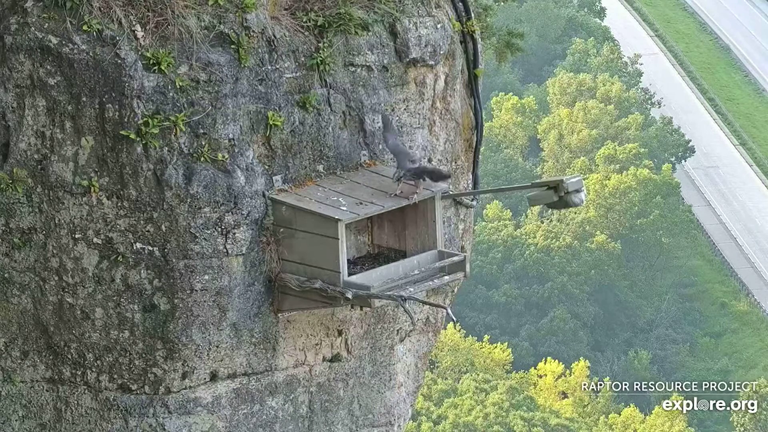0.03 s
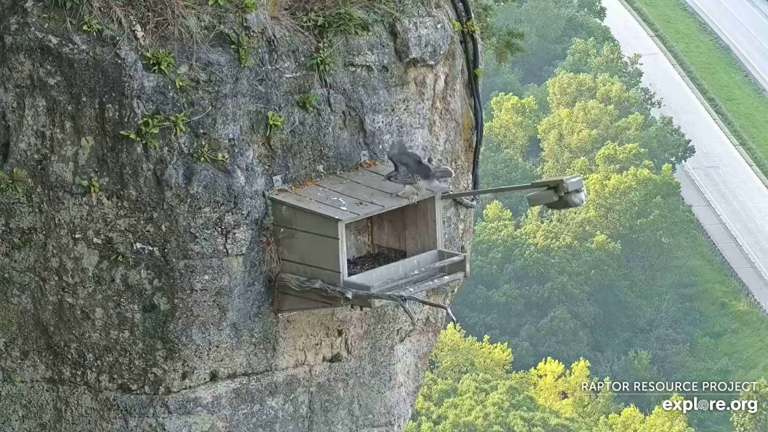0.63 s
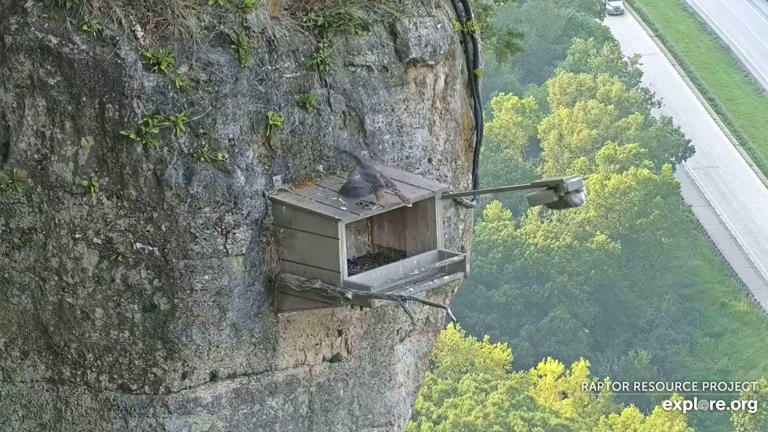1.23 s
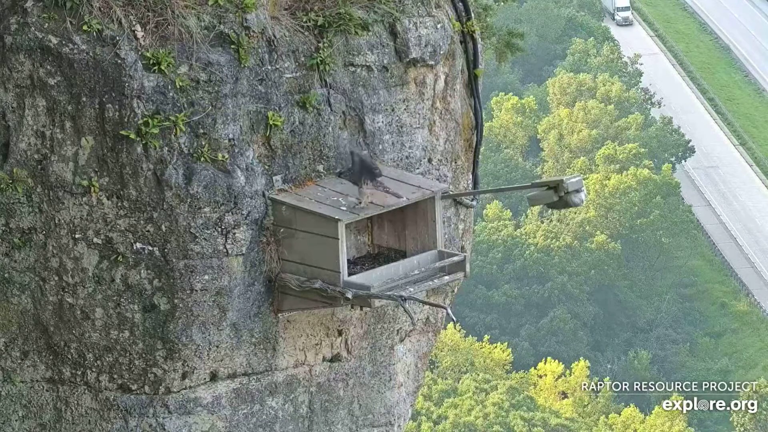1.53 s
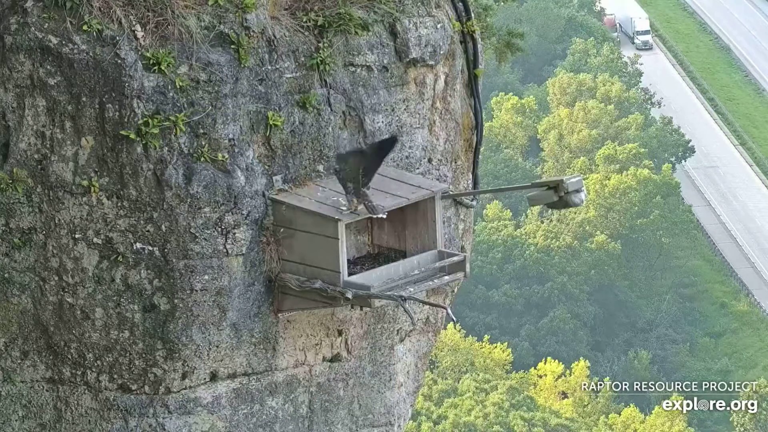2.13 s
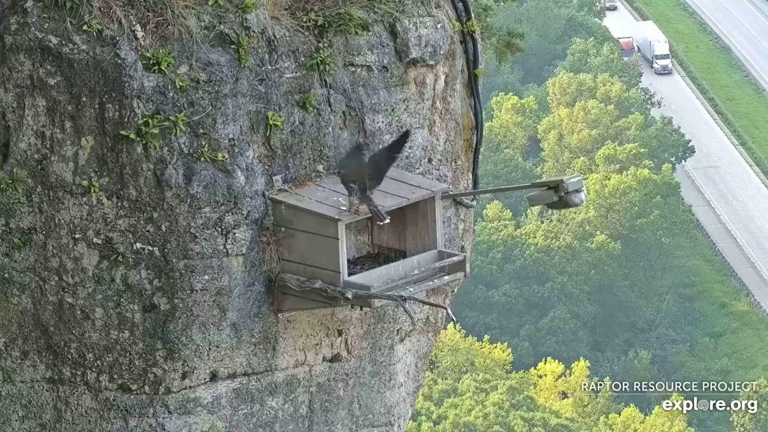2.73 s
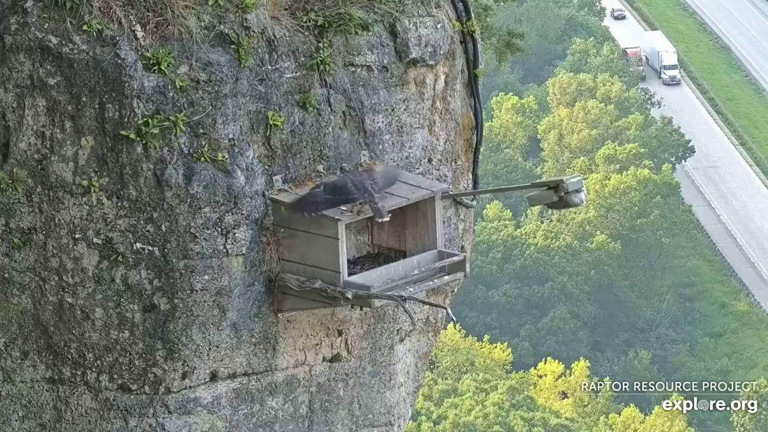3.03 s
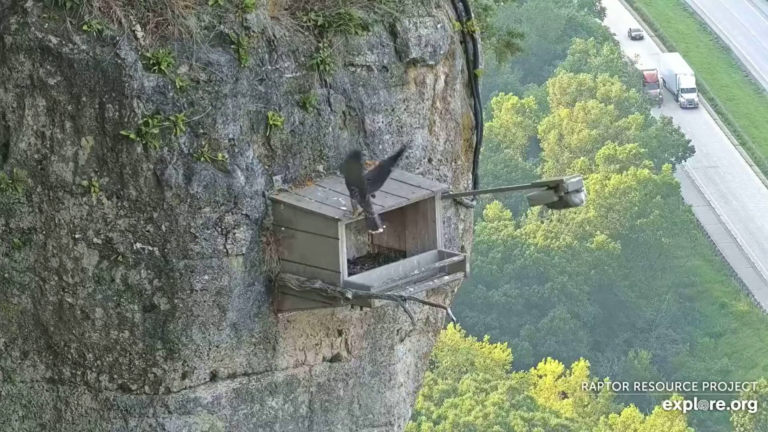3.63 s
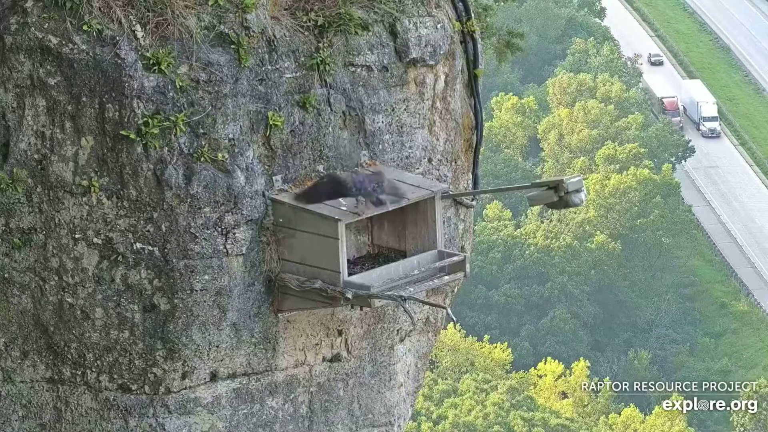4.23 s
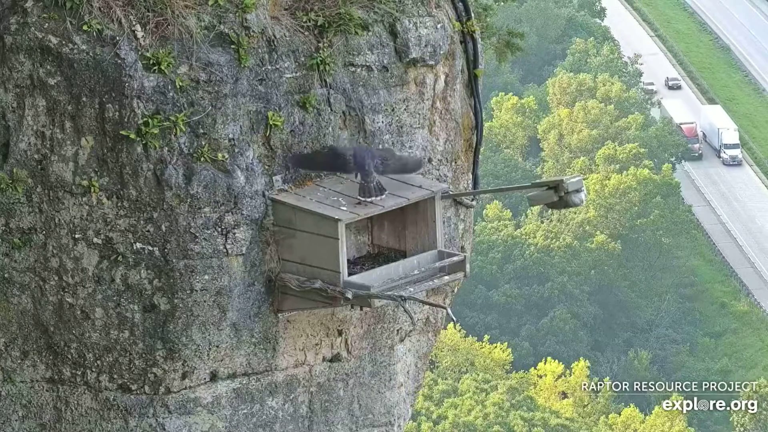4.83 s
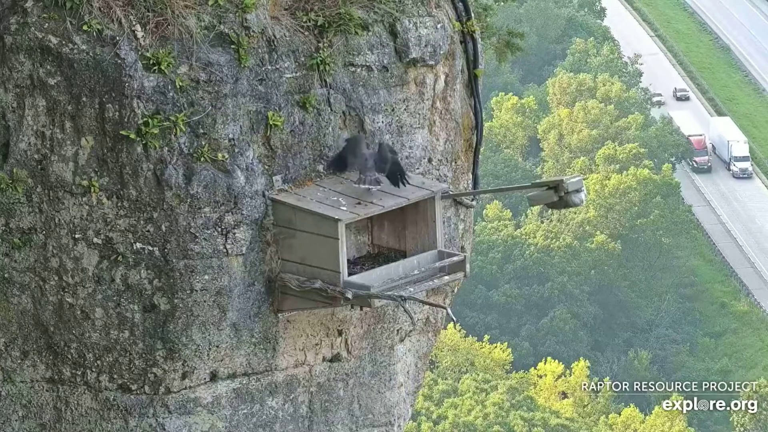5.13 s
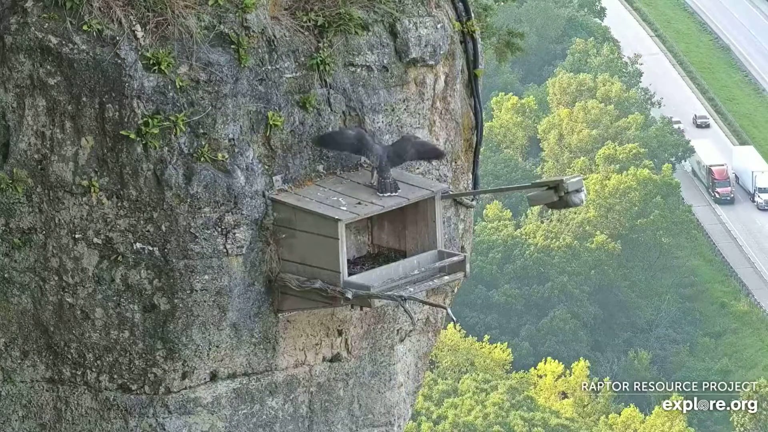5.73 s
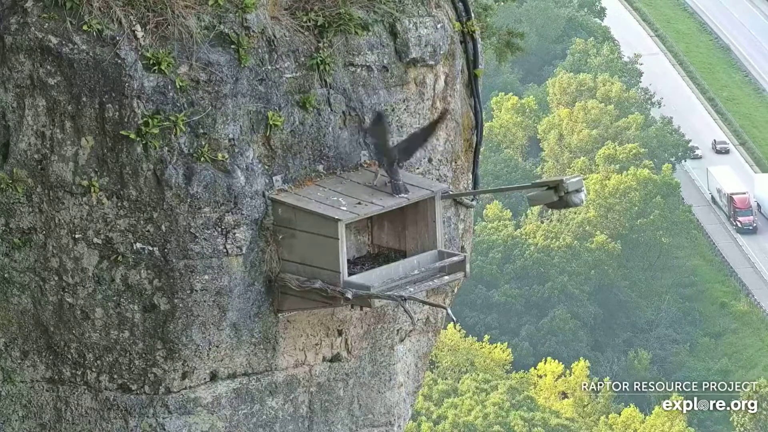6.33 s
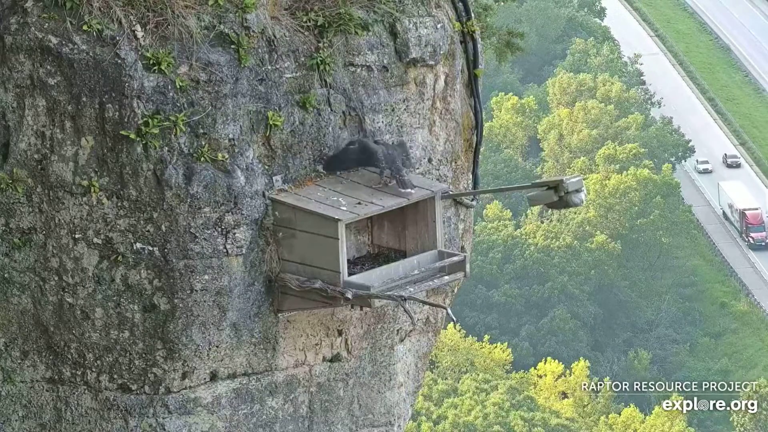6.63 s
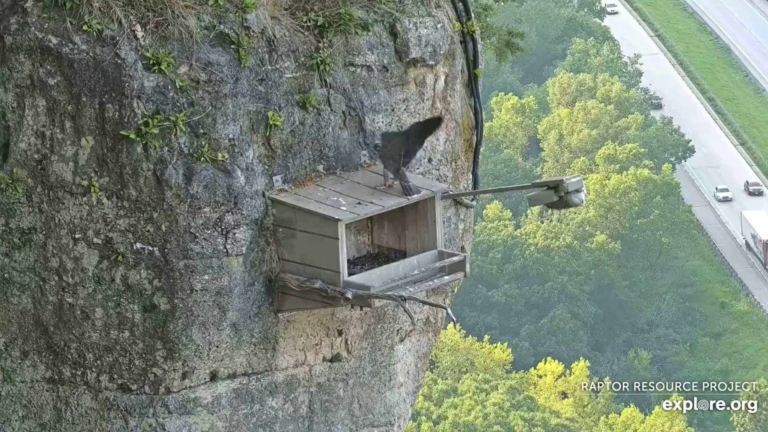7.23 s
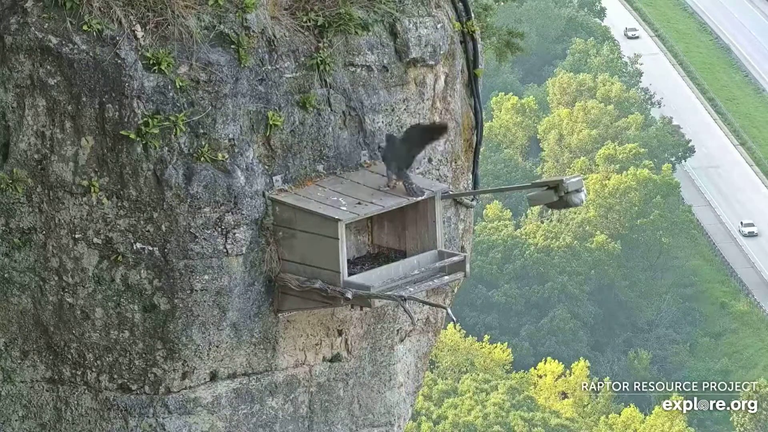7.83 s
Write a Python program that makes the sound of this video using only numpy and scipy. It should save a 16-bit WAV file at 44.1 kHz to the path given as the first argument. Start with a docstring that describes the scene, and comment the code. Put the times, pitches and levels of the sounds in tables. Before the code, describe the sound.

A young falcon begs on the roof of a wooden nest box on a cliff. Its harsh, high wails come two or three a second, each opening as a thin squeal, swelling and ending in a creak. Near the end they give way to shorter, quieter hoarse squawks. Its feet thump the box now and then, with a few faint talon scratches. One microphone catches a slight rock echo and a highway rumbling far below.

```python
"""Harsh begging wails from a young falcon on the roof of a wooden nest box, on a cliff; one microphone.
Each wail opens as a thin squeal from one side of the syrinx, swells in two pushes as the full voice
catches, and falls into a creak as the membranes slacken; short hoarse squawks end the series.
Its feet thump the box, its talons scratch the boards, and the rock face returns a faint echo.
Far below, a highway rumbles in the valley."""
import sys
import numpy as np
from scipy import signal
from scipy.fft import rfft, irfft, next_fast_len
from scipy.io import wavfile

SR = 44100
rng = np.random.default_rng(int(sys.argv[2]) if len(sys.argv) > 2 else 0)


def dump(signal):
    """Clip the signal to [-1, 1] and save it as 16-bit WAV at the path in sys.argv[1]."""
    limited = np.clip(np.atleast_2d(signal).T, -1, 1)
    pcm = np.round(limited * 32767).astype(np.int16)
    wavfile.write(sys.argv[1], SR, pcm)


N = 348390
TIME = np.arange(N) / SR

# overtones of either side of the syrinx, against the strong second harmonic: frequency_hz, level_db
OVERTONE_LEVELS = [(3550, -16.5), (4000, -18.5), (5200, -26), (6600, -30.5), (8000, -40.5), (14000, -51.5)]


def falcon(loud_db=-24, yelp_lead_s=.0268, yelp_s=.013, rasp_share=.2, spit_db=-18, spit_hz=6000):
    """The bird: hoarseness trades wail for squeal and rasp; effort lifts overtones; calls end in a yelp."""
    gate, age, left, closing, creaking, caught, effort_db, pitch, rough, bright_db, root_db = gestures()
    strain = np.clip((effort_db - loud_db) / 6, 0, 1)
    yelp = (1 - creaking) * bump(left - yelp_lead_s, yelp_s)
    bright_db = bright_db - 10 * closing ** 2
    rough = np.clip(rough + .18 * yelp, 0, 1)
    # the second side sounds as the call opens, and cuts in now and then while it is hoarse
    cutting_in = np.clip(wobble(9.7), 0, 1) * rough ** 2
    squeal_share = np.clip(.56 * (1 - caught) + cutting_in, 0, 1)
    pitch = pitch * (1 - .23 * np.exp(-left / .019))  # tension drops at the end
    tilt_db_per_octave = 3.5 * yelp + .07 * (effort_db - loud_db)
    wail = syrinx(pitch, rough, bright_db, tilt_db_per_octave, root_db)
    tone = crossfade(wail, squeal(age, bright_db), squeal_share)
    voiced = crossfade(tone, creak(left), creaking)
    voice = crossfade(voiced, rasp(bright_db + 5 * yelp), rasp_share * rough)
    spit = rms_one(filtered(rng.standard_normal(N), spit_hz, "high"))
    voice += from_db(spit_db) * strain * yelp * spit  # the loudest yelps spit bright air
    tremble_db = 1.6 * (1.5 - strain / 2) * wobble(95)
    return gate * from_db(effort_db + tremble_db) * voice


def calls():
    """The begging series, one row a call: long wails, then short squawks that share one hoarse voice."""
    # long wails (root is the fundamental): start_s, end_s, squeal_s, pitch_hz, climb_hz, level_db,
    # first_push_db, last_push_db, hoarseness (0-1), bright_db, root_db, creak_s
    wails = [(0.106, .474, 0.065, 1252, 150, -29, -0.5, 13, 0.25, 2, -9, .006),
             (0.571, 0.911, 0.043, 1310, 130, -35.5, 0, 5, 0.39, 6.5, -3.5, 0.012),
             (1.027, 1.335, .01, 1375, 119.5, -32, -3.5, 3, 0.24, 2.5, -3, 0.018),
             (1.447, 1.748, 0.032, 1334, -41, -34, -4, 7, 0.18, 6, -11, 0.019),
             (1.871, 2.15, 0.073, 1344, -1, -31.5, 6.5, 12, 0.25, 0.5, -8.5, 0.017),
             (2.264, 2.566, 0.096, 1332, 81, -30, -2, 10.5, 0.25, 2, -7.5, .022),
             (2.688, 2.96, 0.083, 1324, -2, -32, 6.5, 4, 0.55, -.5, -8, 0.027),
             (3.1, 3.394, 0.084, 1320, 22, -31, 7, 12, 0.34, 2.5, -5.5, 0.027),
             (3.519, 3.787, 0.078, 1349, 81.5, -27, 7.5, 10, .24, 3.5, -9.5, 0.023),
             (3.915, 4.047, 0.069, 1220, -120, -25.5, -2, 6.5, .5, 3.5, -20.5, 0.017),
             (4.116, 4.22, 0.037, 1370, 259.5, -22, -3, 2.5, 0.49, 2.5, -7, 0.013),
             (4.294, 4.424, 0.037, 1356, 7, -32.5, 7.5, 9.5, 0.09, 4, -11, 0.0082),
             (4.503, 4.77, 0.045, 1363, -38, -26, 6, 8, 0.22, 3, -9, 0.017),
             (4.917, 5.228, 0.06, 1374, -1, -28, 5, 7, 0.26, 5, -4.5, 0.012),
             (5.374, 5.677, 0.045, 1324, 77, -28, 11, 3, 0.38, -2.5, -8, .012),
             (5.803, 6.089, 0.072, 1273, 30, -30.5, 9, 3.5, 0.37, 1, -8, 0.036)]
    # squeals that crack and run down into a creak: start_s, end_s, squeal_s, creak_s, level_db
    squawks = [(6.227, 6.394, 0.076, 0.064, -35), (6.471, 6.604, .05, 0.077, -33.5),
               (6.685, 6.865, 0.059, 0.037, -34.5), (6.934, 7.069, .035, 0.052, -35),
               (7.147, 7.291, 0.013, 0.047, -34), (7.367, 7.508, 0.011, 0.033, -32),
               (7.588, 7.731, .02, 0.068, -31.5), (7.82, 7.937, 0.018, 0.055, -36)]
    pitch_hz, climb_hz, push_db, hoarseness, bright_db, root_db = 1260, -68.7, 3.5, .504, -4, -11.5
    return np.array(list(wails) + [
        (start, end, squeal_s, pitch_hz, climb_hz, db, push_db, 0, hoarseness, bright_db, root_db, creak_s)
        for start, end, squeal_s, creak_s, db in squawks])


def gestures(attack_s=.019, release_s=.01, catch_s=.009, squeal_db=-37, fade_db_per_s=35,
             arch_hz=30, waver_hz=11):
    """Breath and tension at every sample: each call runs squeal, catch, push, hold, last push, creak."""
    # the voice cracks, hoarse and mostly slack for a moment: time_s, level_drop_db, pitch_drop_hz
    cracks = [(2.052, 1, 21), (2.86, 4.5, 60), (3.299, 4, 51.5), (3.701, -1, 1), (4.675, 1, 36),
              (5.06, 10, -3), (5.577, -5, 93.5), (5.947, 6, 113), (6.019, 7, 95), (7.2, 2.5, 57),
              (7.415, 4.5, 57), (7.64, 7.5, 72)]
    rows = calls()
    current = np.maximum(np.searchsorted(rows[:, 0], TIME) - 1, 0)
    (start, end, squeal_s, pitch_hz, climb_hz, level_db, first_db, last_db,
     hoarseness, bright_db, root_db, creak_s) = rows[current].T
    age, left = np.clip(TIME - start, 0, end - start), np.clip(end - TIME, 0, end - start)
    gate = np.minimum(np.minimum(age / attack_s, left / release_s), 1)
    closing = np.exp(-np.maximum(left - creak_s / 2, 0) / .013)
    creaking = np.clip(.5 + (creak_s - left) / release_s / 2, 0, 1)
    caught = .5 + .5 * np.tanh((age - squeal_s) / catch_s)
    # one push just after the voice catches, another just before the beak closes
    push_db = first_db * bump(age - squeal_s - .04, .032) + last_db * bump(left - .045, .019)
    full_db = level_db + push_db - 3.5 * closing  # the air runs out at the end
    opening_db = squeal_db - fade_db_per_s * age
    effort_db = caught * full_db + (1 - caught) * opening_db + 1.15 * wobble(21.6)
    progress = age / (end - start)
    arch = np.sin(np.pi * progress) - 1
    pitch = pitch_hz + climb_hz * (progress - .5) + arch_hz * arch + waver_hz * wobble(8.33)
    # a push clears the voice and thins its fundamental
    rough = np.clip(hoarseness * from_db(-.94 * push_db), .03, 1)
    root_db = root_db - .1 * push_db
    for time_s, drop_db, drop_hz in cracks:
        crack = bump(TIME - time_s, width_s=.016)
        effort_db -= drop_db * crack
        pitch -= drop_hz * crack
        rough = np.minimum(rough + .321 * crack, 1)
    return gate, age, left, closing, creaking, caught, effort_db, pitch, rough, bright_db, root_db


def syrinx(pitch, rough, bright_db, tilt_db_per_octave, root_db, flutter_hz=340, shimmer_db=5):
    """A harmonic stack led by its second partial; hoarse membranes flutter and split it into sidebands."""
    flutter = np.sin(phase_of(flutter_hz * (1 + .14 * wobble(27.9))))
    shake = rough * (.045 * flutter + .034 * wobble(374))
    wander = .016 * (.5 + rough) * wobble(25.96) + .009 * wobble(75.2)
    phase = phase_of(pitch * (1 + wander + shake))
    tone = np.sin(2 * phase) + from_db(root_db) * np.sin(phase)
    for k in range(3, 12):
        level_db = level_at(k * pitch, OVERTONE_LEVELS) + bright_db + tilt_db_per_octave * np.log2(k / 2)
        tone += from_db(level_db + shimmer_db * wobble(29)) * np.sin(k * phase)
    return np.sqrt(2) * tone * (1 + .5 * rough * flutter)


def squeal(age, bright_db, top_hz=1150, crest_s=.046, droop_s=.1, edge_db=2):
    """The other side of the syrinx: thin, without a fundamental, a small arch that settles lower."""
    droop = np.tanh(((age - crest_s) / droop_s) ** 2)
    pitch = top_hz * (1 - .066 * droop + .038 * wobble(24.57) + .0102 * wobble(418))
    phase = phase_of(pitch)
    third_db = -6 - 10 * droop + 2.03 * wobble(25)
    tone = np.sin(2 * phase) + from_db(third_db) * np.sin(3 * phase)
    for k in range(4, 9):
        level_db = level_at(k * pitch, OVERTONE_LEVELS) + bright_db / 3 + edge_db + 6 * wobble(36)
        tone += from_db(level_db) * np.sin(k * phase)
    return np.sqrt(2) * tone


def creak(left, slack_hz=530, fall_s=.025, jitter=.033, shimmer_db=4):
    """Slack membranes buzz low and unevenly, and run down as the air stops."""
    # the buzz through the half-closed beak: frequency_hz, level_db
    beak = [(500, -14), (850, -16), (1400, -3), (2700, 0), (3400, -17), (7500, -38)]
    pitch = slack_hz * (1 - .35 * np.exp(-left / fall_s))
    phase = phase_of(pitch * (1 + jitter * wobble(225.6)))
    buzz = np.zeros(N)
    for k in range(1, 17):
        gain = from_db(level_at(k * pitch, beak) + shimmer_db * wobble(58))
        buzz += gain * np.sin(k * phase + rng.uniform(0, 2 * np.pi))
    return rms_one(buzz)


def rasp(bright_db, split_hz=3300):
    """Turbulent air in uneven puffs, coloured by the throat; an open beak lets out the highs."""
    # resonance of throat and beak: frequency_hz, gain_db
    throat = [(500, -64), (1300, -10), (1750, -9.5), (2300, -2.5), (2700, 7), (3250, -1.5), (4000, -5),
              (6500, -11), (7500, -21.5), (15000, -39.5)]
    air = coloured(rng.standard_normal(N), throat) * from_db(wobble(410))
    dull = filtered(air, split_hz, "low", order=4)
    dull = filtered(dull[::-1], split_hz, "low", order=4)[::-1]  # backwards too, to stay in phase
    return dull + from_db(bright_db) * (air - dull)


def footfalls(knock_hz=1700, knock_db=8, knock_s=.011, dispersion=.2):
    """Each landing is a short crunch and a blow that rings the box; bending waves carry the highs first."""
    # feet landing on the roof: start_s, thump_db, hardness_db
    landings = [(0.421, -23, -16), (.746, -11.5, -3), (0.796, -17.5, -20), (1.234, -22, -20),
                (1.653, -22, -13), (1.97, -23, -15), (2.618, -17, -17), (4.448, -21.5, -4.5),
                (4.881, -25.5, -31), (4.976, -17, -10), (5.257, -22, -8), (5.325, -13, -15.5)]
    # modes of the box and its arm: frequency_hz, gain_db, t60_s
    box_modes = [(104.5, -5.5, 0.5), (189, 4, 0.06), (254.4, -2.5, 0.078), (351, -21.5, 0.14)]
    blows, crunch = np.zeros((2, N))
    for start_s, thump_db, hardness_db in landings:
        blows[int(start_s * SR)] = from_db(thump_db)
        crunch += from_db(thump_db + hardness_db) * burst(start_s, knock_s)
    body = sum(from_db(db + wobble(5.3)) * ring(blows, hz, t60_s) for hz, db, t60_s in box_modes)
    knocks = from_db(knock_db) * filtered(crunch * rng.standard_normal(N), knock_hz, "low", order=4)
    wood = filtered(body + knocks, 75, "high", order=4)
    lag_cycles = 2 * dispersion * np.sqrt(np.fft.rfftfreq(N, 1 / SR))
    return irfft(rfft(wood) * np.exp(-2j * np.pi * lag_cycles), N)


def talons(decay_s=.0052, gain_db=-3):
    """Talons catch on the boards in short dry scratches."""
    # scratches on the roof: start_s, level_db
    scratches = [(0.572, -32), (4.091, -29), (4.27, -29), (4.813, -30)]
    envelope = sum(from_db(db + gain_db) * burst(start_s, decay_s) for start_s, db in scratches)
    return envelope * coloured(rng.standard_normal(N), [(600, -5), (3200, -2), (14000, -33)])


def cliff(direct, echo_s=.055, echo_db=-22, scatter_db=-24, t60_s=.35):
    """The direct sound, one echo from the rock face and a short scatter from box and ledges."""
    t = TIME[:SR // 2]
    tail = rng.standard_normal(len(t)) * from_db(-60 * t / t60_s)
    scatter = signal.fftconvolve(direct, tail / np.linalg.norm(tail))[:N]
    echo = np.interp(TIME - echo_s, TIME, direct, left=0)
    return direct + from_db(echo_db) * echo + from_db(scatter_db) * scatter


def highway(level_db=-28.5, swell_db=2):
    """Engines rumble and tyres hiss far below, swelling a little in the wind."""
    # traffic and air as they reach the cliff: frequency_hz, relative_db
    traffic = [(35, -42), (60, -26), (74, 2), (105, 4.5), (135, -5), (165, -4.5), (200, -15.5), (290, -13),
               (600, -38), (1050, -22), (1800, -34), (4000, -40.5), (7500, -61), (15000, -66)]
    rumble = filtered(coloured(rng.standard_normal(N), traffic), 39, "high")
    return from_db(level_db + swell_db * wobble(12.9)) * rumble


def from_db(db):
    """Decibels to gain."""
    return 10 ** (np.asarray(db) / 20)


def rms_one(x):
    """Scale to unit power."""
    return x / np.sqrt(np.mean(x ** 2) + 1e-20)


def crossfade(a, b, share):
    """Equal-power mix with the given share of b."""
    return np.sqrt(1 - share) * a + np.sqrt(share) * b


def phase_of(hz):
    """Running phase of a moving pitch, in radians."""
    return 2 * np.pi * np.cumsum(hz) / SR


def level_at(hz, spectrum):
    """Level between (Hz, dB) points."""
    return np.interp(hz, *np.transpose(spectrum))


def coloured(x, spectrum):
    """Shape x by a spectrum of (Hz, dB) points; unit power."""
    size = next_fast_len(N)
    hz, db = np.transpose(spectrum)
    gain = from_db(np.interp(np.log(np.fft.rfftfreq(size, 1 / SR) + 1), np.log(hz), db))
    return rms_one(irfft(rfft(x, size) * gain, size)[:N])


def filtered(x, hz, kind, order=2):
    """Butterworth filter."""
    return signal.sosfilt(signal.butter(order, hz, kind, fs=SR, output="sos"), x + 1e-18)


def wobble(rate_hz):
    """Random motion up to a rate; spread 1."""
    return rms_one(filtered(rng.standard_normal(N + SR), rate_hz, "low")[SR:])


def ring(x, hz, t60_s):
    """A unit click sets a sine of height 1 ringing."""
    radius, angle = from_db(-60 / (t60_s * SR)), 2 * np.pi * hz / SR
    return signal.lfilter([0, np.sin(angle)], [1, -2 * radius * np.cos(angle), radius ** 2], x + 1e-18)


def bump(t, width_s):
    """A smooth hump of height 1 around t = 0."""
    return np.exp(-(t / width_s) ** 2)


def burst(start_s, decay_s):
    """An envelope that jumps to 1 and dies away."""
    return (TIME > start_s) * np.exp(-np.abs(TIME - start_s) / decay_s)


def scene():
    """Bird, box and valley at one microphone."""
    return (cliff(falcon() + talons()) + footfalls() + highway())[None]


def record(dry, cutoff_hz=15700):
    """The top treble is cut steeply."""
    return signal.sosfilt(signal.ellip(10, .1, 90, cutoff_hz, fs=SR, output="sos"), dry)


dry = scene()
out = record(dry)
dump(out)
```